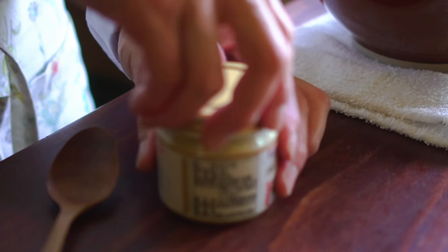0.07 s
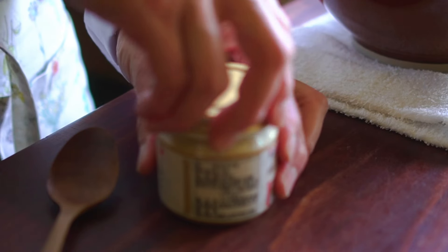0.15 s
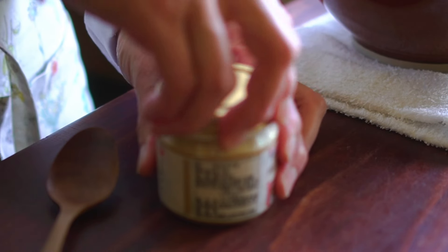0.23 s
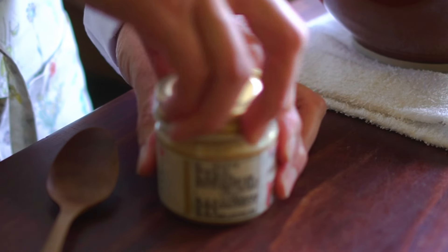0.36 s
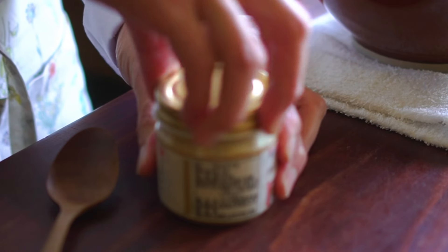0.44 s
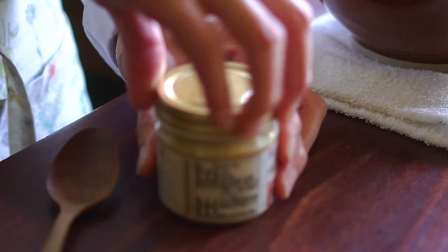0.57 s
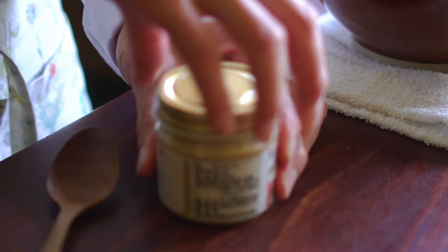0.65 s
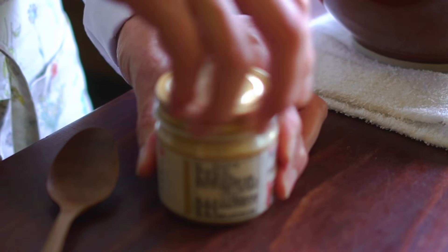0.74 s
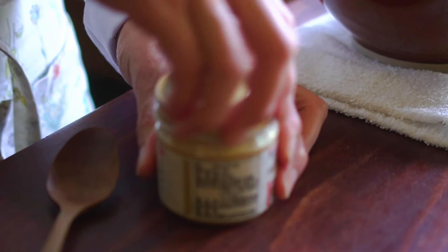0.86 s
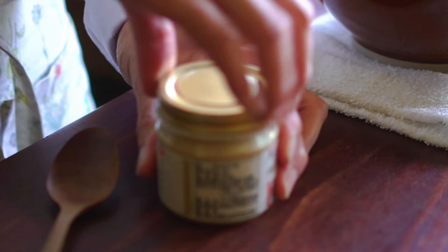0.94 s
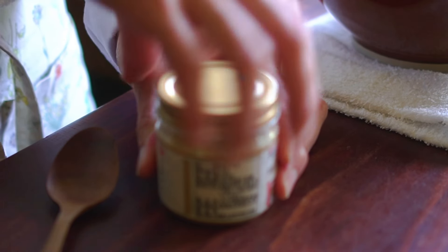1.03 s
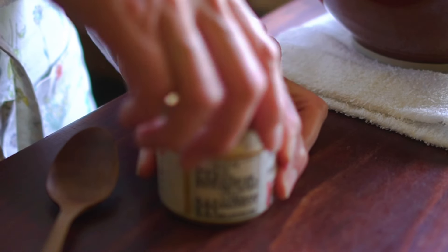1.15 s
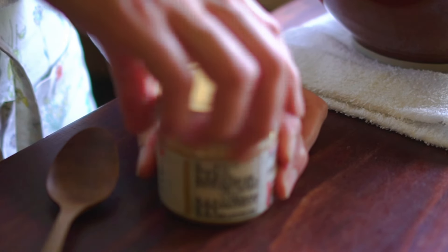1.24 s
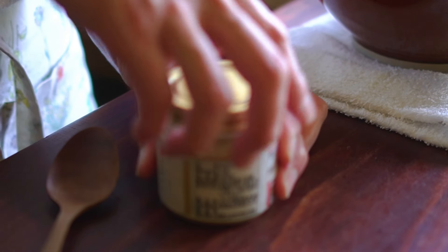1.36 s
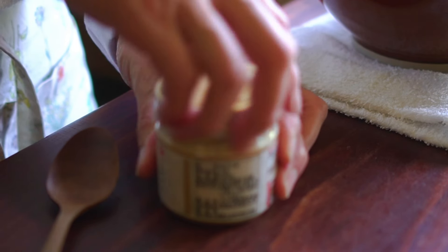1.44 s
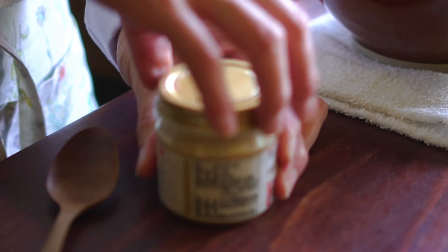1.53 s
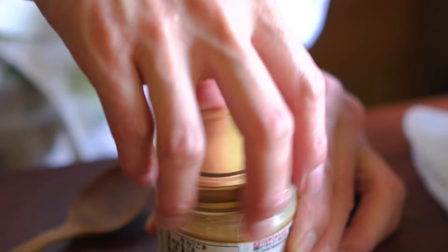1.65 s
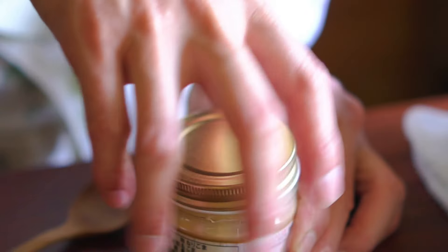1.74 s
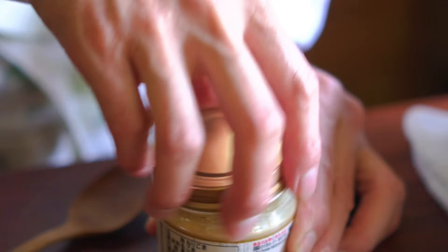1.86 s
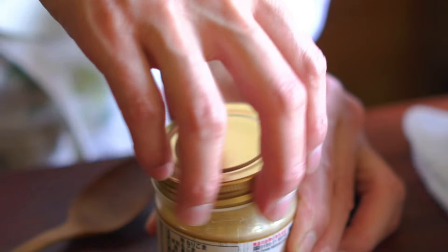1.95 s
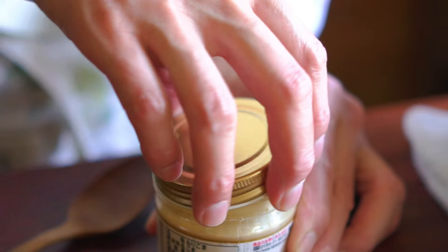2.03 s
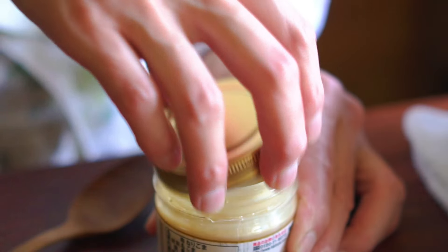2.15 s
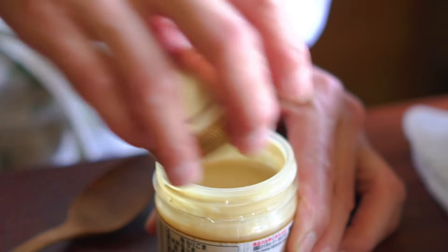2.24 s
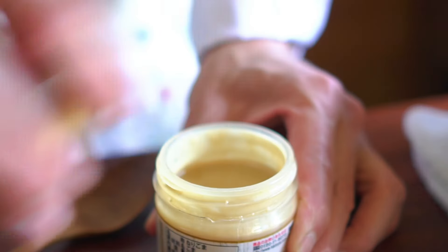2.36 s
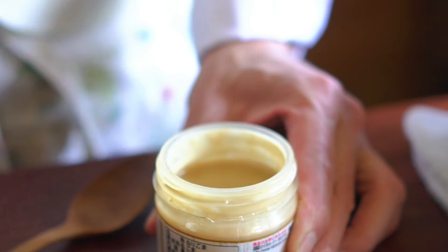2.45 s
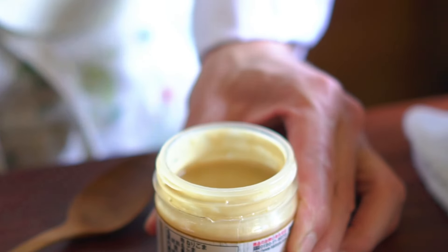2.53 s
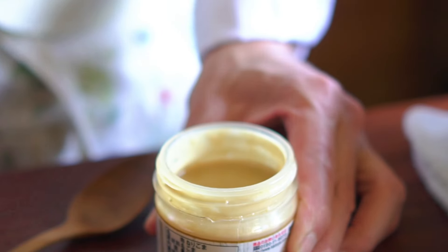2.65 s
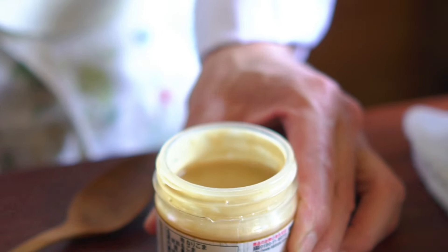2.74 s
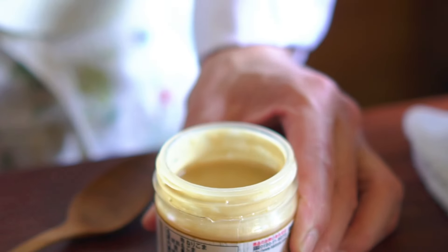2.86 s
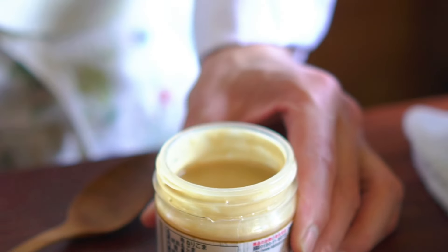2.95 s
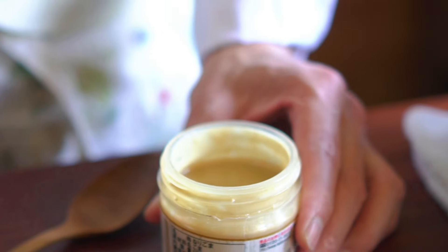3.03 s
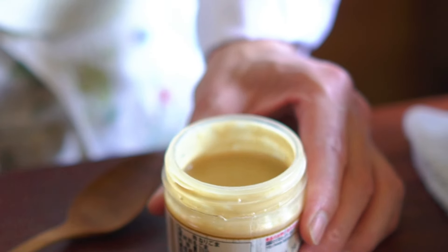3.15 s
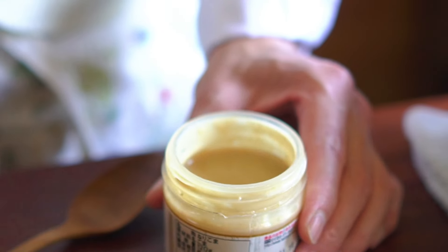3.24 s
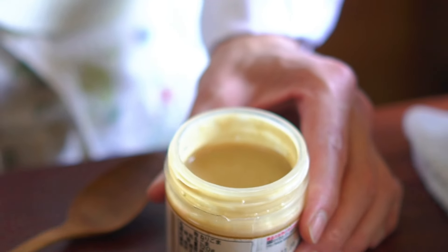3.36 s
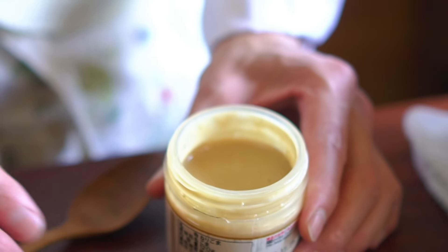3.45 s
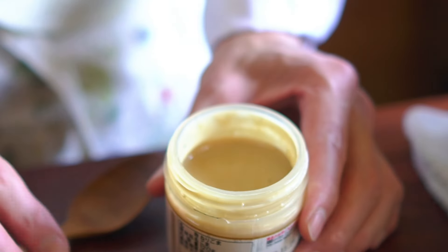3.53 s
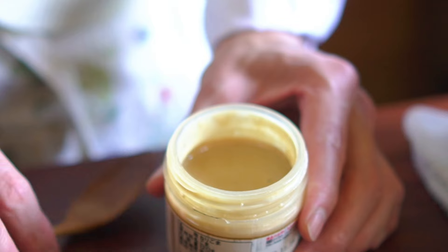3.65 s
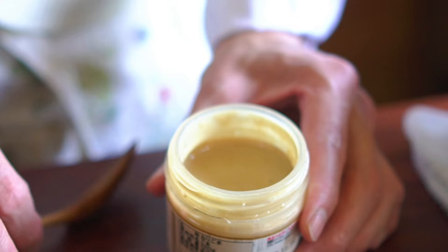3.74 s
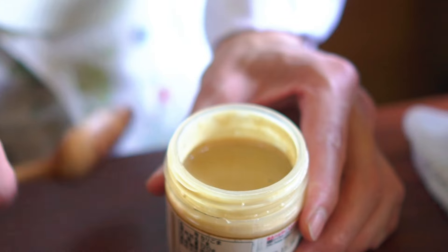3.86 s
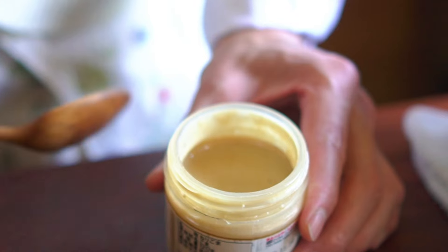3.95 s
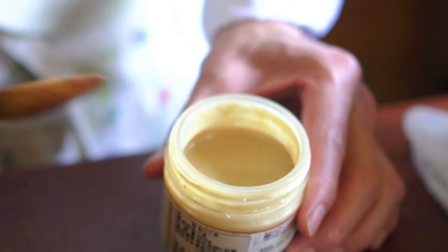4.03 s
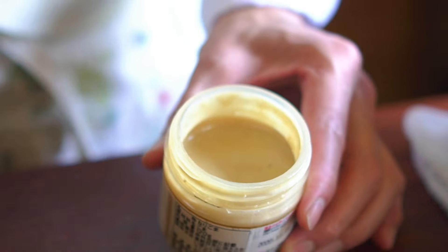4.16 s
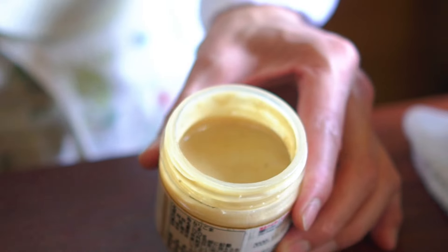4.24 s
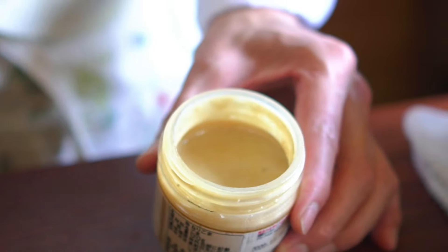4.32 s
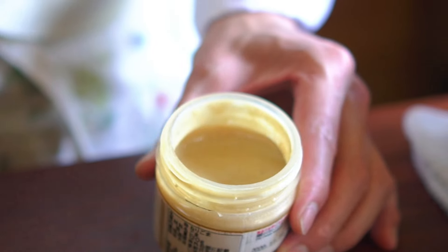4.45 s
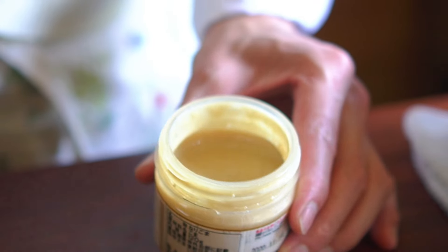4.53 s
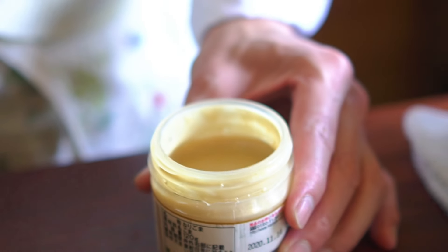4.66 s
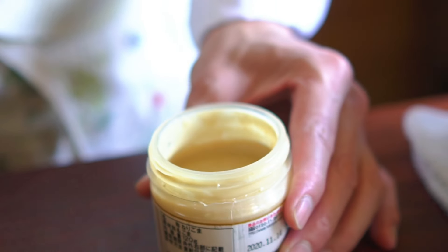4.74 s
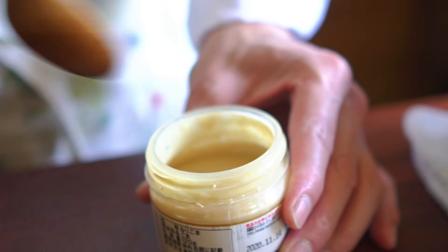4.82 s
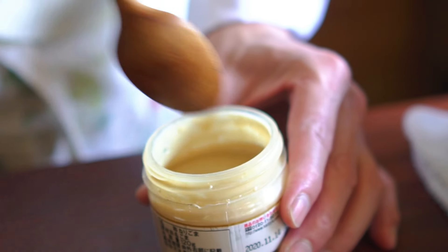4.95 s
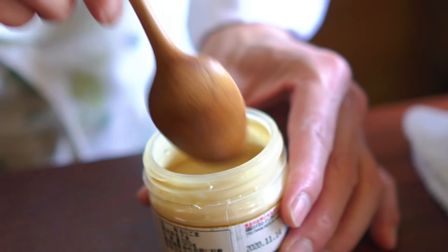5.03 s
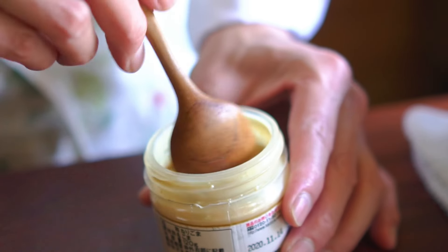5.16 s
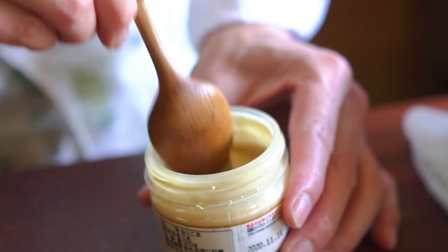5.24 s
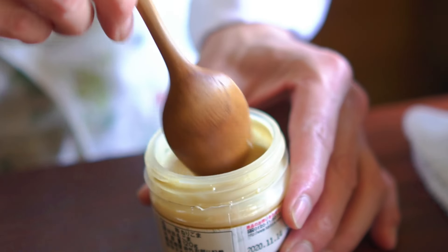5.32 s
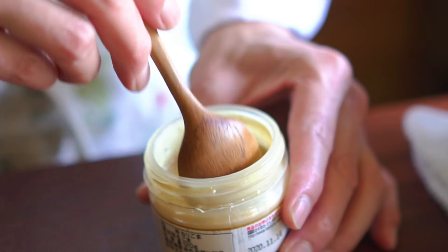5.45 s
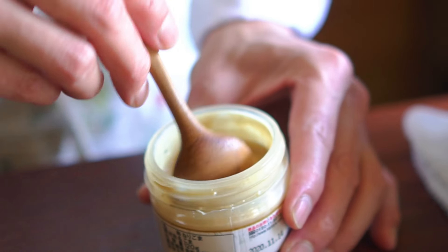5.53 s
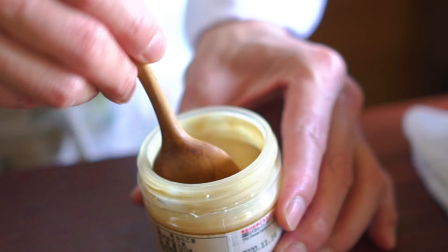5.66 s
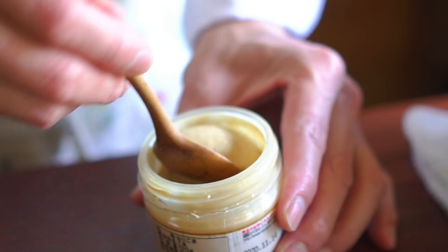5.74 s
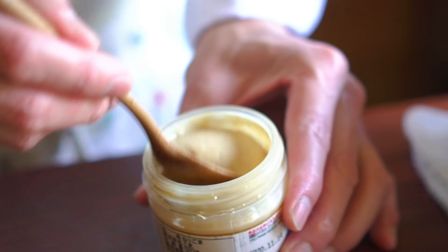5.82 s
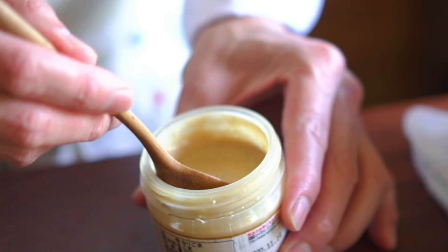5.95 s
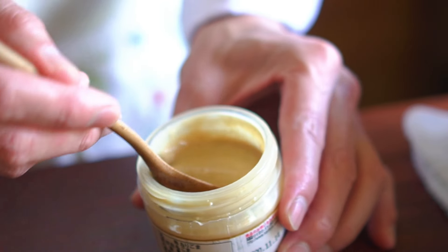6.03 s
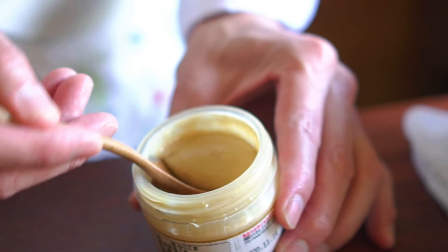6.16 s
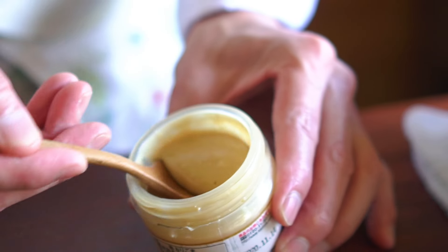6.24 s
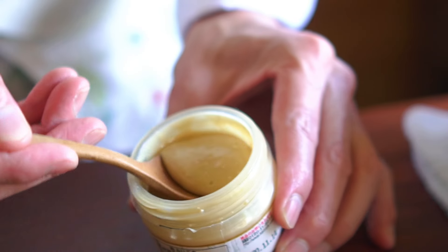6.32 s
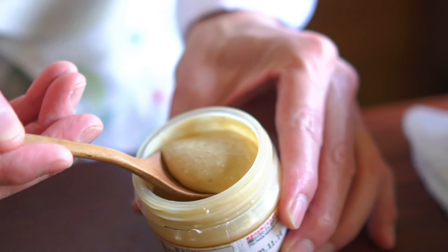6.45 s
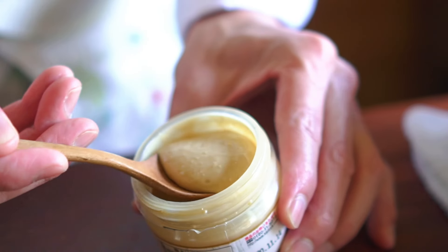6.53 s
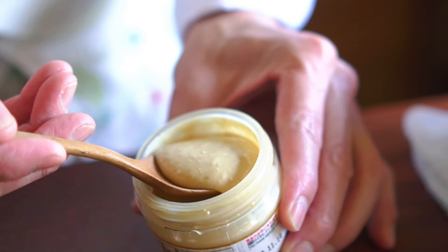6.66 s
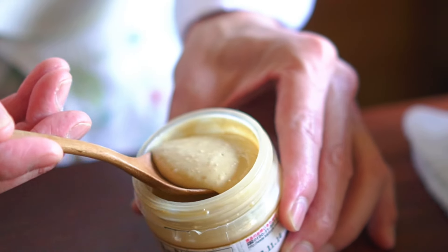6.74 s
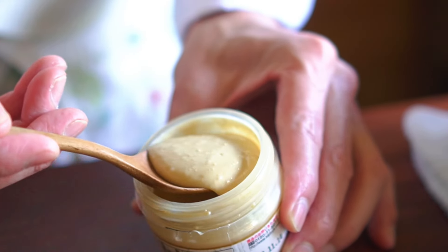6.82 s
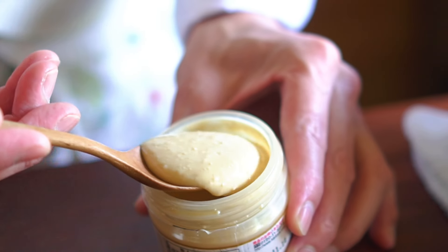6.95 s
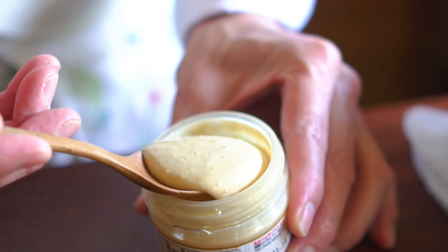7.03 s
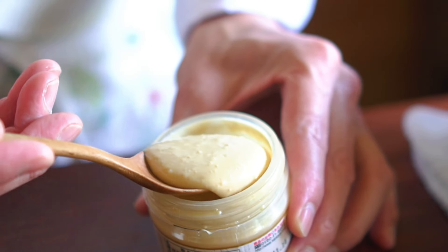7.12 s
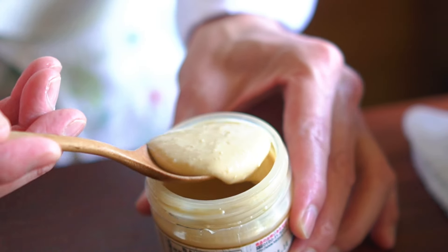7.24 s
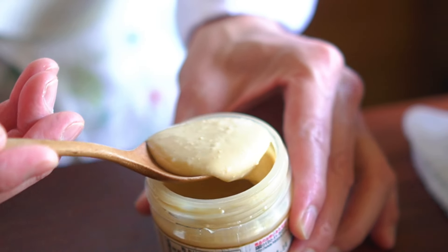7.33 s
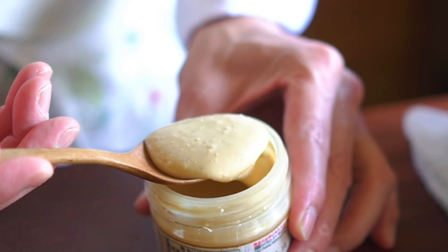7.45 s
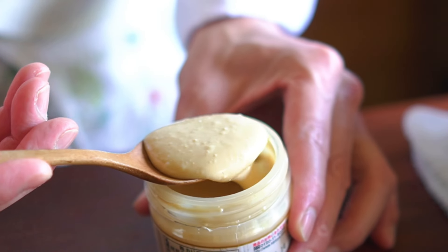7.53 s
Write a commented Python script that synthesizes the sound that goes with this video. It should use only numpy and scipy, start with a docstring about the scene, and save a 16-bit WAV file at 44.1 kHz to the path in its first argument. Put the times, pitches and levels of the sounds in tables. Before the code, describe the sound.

A metal lid is twisted off a glass jar close by, over the low rumble of a small kitchen. For the first 1.6 seconds, the thread rasps in several gritty pushes, with sharp cracks loudest around 0.3 to 0.6 seconds, dull jar knocks and table thuds. The sound drops out briefly near 1.7 seconds, returning with a last, thinner scrape and a thud. The lid bumps the rim at about 2.1 seconds, touches the wooden table at 2.7, then clatters in quickening bounces to rest by 3.2. Light clicks follow around 3.5 as a wooden spoon is picked up. From 4 to 5 seconds, it slides through dry fingers with a faint, squeaky hiss. It clinks lightly on the glass at 5.1, then scrapes very faintly through thick paste, with soft, damped knocks near 6.1, 7 and 7.5 seconds.

```python
"""Over the low rumble of a small kitchen, a metal lid is twisted off a glass jar close by: grit in the
thread rasps and cracks by stick-slip friction, and the table thuds below. The lid is lifted and put
on the wooden table, where it bounces ever faster, each impact exciting its modes, and rattles to rest.
Then a wooden spoon is picked up and slides through the fingers, the dry skin squeaking on it.
Last, it scrapes through a thick paste and knocks softly in the jar, damped by the filling."""
import sys
import numpy as np
from scipy import signal
from scipy.io import wavfile
from scipy.ndimage import uniform_filter1d

SR = 44100
rng = np.random.default_rng(int(sys.argv[2]) if len(sys.argv) > 2 else 0)


def int16_out(signal):
    """Quantize to a 16-bit WAV file."""
    q = np.round(np.clip(np.atleast_2d(signal).T, -1, 1) * 32767)
    wavfile.write(sys.argv[1], SR, q.astype(np.int16))


N = 334489
TIME = np.arange(N) / SR
RING_TIME = np.arange(SR // 2) / SR

# spectrum of the room tone: f/Hz, level/dB
ROOM_SPECTRUM = [(20, -11.5), (48, 1.5), (100, 1.5), (190, -15.5), (240, -12.5), (400, -27.5), (1200, -43),
                 (2200, -50.5), (4000, -49.5), (5000, -46), (14200, -48.5)]
# set gain curve on the steady room tone, as of a noise suppressor: t/s, rumble gain/dB, hiss gain/dB
SUPPRESSOR_GAIN = [(.1, 3.5, 1.5), (.78, -5.5, -16.5), (1.7, 6.5, 19), (2.1, 0, 6), (2.85, -2.5, 2.5),
                   (3.38, -1, -9), (3.52, 1.5, 7), (5.15, -1.5, 3.5), (5.3, -2, 0), (5.6, -0.5, 6),
                   (7.58, -0.5, 5.5)]
# reverberation time of the kitchen: f/Hz, T60/s
REVERB_TIMES = [(100, .68), (500, .28), (1200, .22), (3000, .31), (8000, .18)]
# thuds of the table top: t/s, level/dB
THUDS = [(0.167, -24.5), (0.346, -22.5), (0.56, -33.5), (1.124, -31.5), (1.454, -21), (1.848, -15),
         (2.907, -23), (3.068, -29), (3.568, -32), (6.207, -26.5), (7.05, -29)]
# lid and spoon brush the glass rim: t/s, level/dB
CLINKS = [(2.18, -46), (5.127, -36)]
# modes of the glass rim: f/Hz, level/dB
GLASS_MODES = [(2680, 0), (3570, -3), (4080, -1)]
# clicks as lid and spoon are handled: t/s, level/dB, centre f/Hz
CLICKS = [(1.122, -37.5, 2570), (2.4338, -32, 3100), (3.438, -36, 700), (3.708, -32.5, 1110),
          (3.776, -38.5, 1490), (5.1, -38.5, 4600), (5.1254, -34, 3825)]
# spectrum common to these clicks: f/Hz, level/dB
CLICK_SPECTRUM = [(700, 6.5), (1400, -11.5), (2600, -4), (5200, -7), (8200, 3.5), (16000, -16)]
# fingers and spoon knock on the filled jar: t/s, level/dB, centre f/Hz
JAR_KNOCKS = [(0.823, -38.5, 467), (1.121, -30.5, 271.7), (1.289, -26.5, 366), (1.413, -20.5, 282),
              (1.522, -25, 314), (1.633, -21, 402), (1.848, -21, 188), (3.437, -27.5, 453),
              (6.082, -33, 487), (6.127, -28.5, 500), (7.045, -29.5, 363), (7.474, -38.5, 613)]
# the lifted lid bumps the jar's mouth: t/s, level/dB
LIFT_BUMPS = [(2.076, -24), (2.148, -31.5)]
# spectrum of the lid damped by the fingers: f/Hz, level/dB
HELD_LID_SPECTRUM = [(500, -30), (800, -18.5), (1000, -10.5), (1180, 2), (1350, -24.5), (1700, -48.5)]
# strokes of the spoon along the wall and through the paste: peak t/s, rise and fall/s, level/dB
SCRAPES = [(5.141, 0.05, -51), (6.15, 0.24, -61), (6.895, 0.065, -61.5)]
# spectrum of that scraping: f/Hz, level/dB
SCRAPE_SPECTRUM = [(2000, 4), (5500, -6), (8300, 4.5), (14000, -6)]
# wet ticks of air pockets in the paste: t/s, level/dB, centre f/Hz, T60/s
PASTE_TICKS = [(5.241, -31.5, 13170, 0.0085), (5.885, -54, 1470, 0.12)]
# fingers slide along the spoon: peak t/s, rise and fall/s, rub level/dB, sizzle level/dB
SLIDES = [(3.98, 0.21, -56, -66), (4.148, 0.085, -42.5, -49.5), (4.321, 0.051, -55.5, -62),
          (4.48, .06, -64, -82), (4.625, 0.046, -46, -64), (4.669, 0.011, -40, -53),
          (4.775, 0.098, -47.5, -51), (4.927, 0.034, -35, -33)]
# spectrum of skin rubbing on wood: f/Hz, level/dB
SKIN_SPECTRUM = [(2500, -21), (4700, -17), (7300, -1.5), (12000, 7.5), (15000, -8)]
# resonances of skin squeaking on wood: f/Hz, width/Hz, relative level/dB
SKIN_RESONANCES = [(3550, 340, -15), (6400, 380, -1), (8500, 700, -2), (12000, 800, -2)]
# modes of the free lid: f/Hz, level/dB, T60/s
LID_MODES = [(1092.9, -23, .05), (1136, -11.5, 0.044), (1208.4, -4, 0.043), (2080, -25, 0.048),
             (2532, -13.5, .05), (2729, -14.5, 0.021), (2835, -4, 0.031), (2967, 0, 0.022),
             (3560, -18.5, 0.026), (3976, -11, 0.035), (7160, -19.5, .025)]
# spectrum of the lid's rim striking the table: f/Hz, level/dB
CLATTER_SPECTRUM = [(100, -42), (450, -12), (650, -7), (900, -18), (1190, -5), (1450, -11), (2000, -5.5),
                    (2230, -11), (2880, -0.5), (3250, -10), (4000, -1), (4750, -14), (6750, -12.5),
                    (7800, -18.5), (8150, -12.5), (9200, -26), (15000, -29.5)]
# strength of each bounce in turn: relative level/dB
BOUNCE_LEVELS = [0, -1, -2, -8, -10, -6, -9]
# the loudest grains cracking in the thread: t/s, level/dB, lower band edge f/Hz
SNAPS = [(0.161, -15, 5000), (0.3065, 0.5, 4700), (0.3348, -10.5, 5300), (.3807, -8.5, 7500),
         (.3937, -2, 5900), (0.3963, -6, 7500), (0.4108, -4.5, 7900), (0.4326, -5, 6000),
         (0.451, -10.5, 6900), (0.5247, -13, 3510), (.562, -3, 5960), (0.5666, 0, 4196),
         (0.821, -27.5, 4750), (1.3214, -17.5, 6800), (1.335, -15, 6200), (1.4557, -30, 7550),
         (1.4777, -18, 6900), (1.4922, -7.5, 6760)]
# pushes on the lid: start t/s, peak t/s, rise/s, fall/s, grit level/dB, jar body level/dB
PUSHES = [(0.153, 0.16, 0.02, 0.43, -41.5, -62.5), (0.295, 0.396, 0.14, 0.23, -29, -65),
          (0.548, 0.551, 0.057, 0.074, -32.5, -62), (0.855, 0.945, 0.08, 0.029, -28.5, -39),
          (1.167, 1.222, 0.057, 0.13, -29.5, -37.5), (1.388, 1.51, 0.082, 0.029, -22.5, -37),
          (1.844, 1.915, 0.11, 0.11, -29.5, -51)]
# spectrum of grit under the tight lid: f/Hz, level/dB
TIGHT_GRIT_SPECTRUM = [(1300, -15.5), (2300, -22), (3500, -8), (5300, -7), (7000, -1.5), (9000, 6),
                       (11000, -4.5), (12600, -9), (14400, -9.5)]
# spectrum of grit under the loose lid: f/Hz, level/dB
LOOSE_GRIT_SPECTRUM = [(2200, -59.5), (3800, -18.5), (5300, -23), (6500, -1), (8000, 4), (9500, -4),
                       (14500, -13)]
# spectrum of the jar's grinding body: f/Hz, level/dB
JAR_SPECTRUM = [(100, 0.5), (240, 5), (480, 6), (600, -6.5), (720, 1.5), (900, -11.5), (1170, 6),
                (1550, -26.5), (3000, -16), (6000, -35)]
# rasps of the tight lid: peak t/s, rise and fall/s, centre f/Hz, glide/(octaves/s), level/dB
RASPS = [(0.449, 0.12, 4255, 2.5, -47), (0.59, 0.09, 4400, -.5, -43.5), (0.872, 0.042, 4550, -2.5, -46)]

BAND_LIMIT_HZ = 15300


def amp(db):
    """Amplitude ratio of a level in decibels."""
    return 10 ** (np.asarray(db) / 20)


def unit_rms(x):
    """Normalisation to an rms of one."""
    return x / np.sqrt(np.mean(x ** 2) + 1e-20)


def unit_peak(x):
    """Normalisation to a peak of one."""
    return x / (abs(x).max() + 1e-20)


def read(points, hz):
    """Interpolation of a table on a logarithmic frequency axis."""
    f, value = np.transpose(points)
    return np.interp(np.log(hz + 1), np.log(f + 1), value)


def add(mix, s, sound):
    """Superposition: a sound joins the mix at time s."""
    part = mix[max(round(s * SR), 0):][:len(sound)]
    part += sound[:len(part)]


def cut(x, hz, kind, order=2):
    """Maximally flat low-pass or high-pass filtering."""
    return signal.sosfilt(signal.butter(order, min(hz, SR / 2 - 1), kind, fs=SR, output="sos"), x)


def colour(x, spectrum, size=4096):
    """Minimum-phase filtering: a causal response with the given spectrum."""
    log_gain = np.log(amp(read(spectrum, abs(np.fft.fftfreq(size, 1 / SR)))))
    response = np.fft.ifft(np.exp(np.conj(signal.hilbert(log_gain)))).real
    return signal.oaconvolve(x, response[:size // 2])[:len(x)]


def hump(centre_hz, octaves):
    """Resonance curve: a single peak, symmetric in log frequency."""
    hz = np.geomspace(20, SR / 2, 200)
    return np.c_[hz, -46 * np.log10(1 + (np.log2(hz / centre_hz) / octaves) ** 2)]


def resonate(x, hz, width_hz):
    """Forced vibration of a steep resonance whose centre follows the curve hz."""
    carrier = np.exp(2j * np.pi * np.cumsum(hz) / SR)
    pole = np.exp(-np.pi * width_hz / SR)
    baseband = signal.lfilter([(1 - pole) ** 2], [1, -2 * pole, pole * pole], x / carrier + 1e-18)
    return unit_rms((carrier * baseband).real)


def decay(t60):
    """Damping: an exponential fall of 60 dB in t60 seconds."""
    return np.exp(-np.log(1000) * RING_TIME / t60)


def burst(t60):
    """Decaying noise: a contact breaks up into a scatter of tiny impacts."""
    return rng.standard_normal(len(RING_TIME)) * decay(t60)


def knock(spectrum, centre_hz, t60, scatter_db):
    """Damped impact: a force pulse and a dying scatter; the longer the pulse, the duller the sound."""
    phase = 2 * np.pi * centre_hz * RING_TIME
    blow = unit_peak(colour(phase * np.exp(-2 * phase), spectrum))
    return unit_peak(blow + amp(scatter_db) * unit_peak(colour(burst(t60), spectrum)))


def slips(per_s, spread_db):
    """Stick-slip friction: random impulses of uneven size."""
    size = amp(spread_db * np.minimum(rng.exponential(1, N), 4))
    return size * rng.choice([-1, 1], N) * (rng.random(N) < per_s / SR)


def dry_friction(grains_db):
    """Friction noise: countless slips merge into a hiss, with sparse coarser grains in it."""
    grains = signal.oaconvolve(slips(per_s=260, spread_db=2.5), burst(t60=.003))[:N]
    return unit_rms(rng.standard_normal(N) + amp(grains_db) * unit_rms(grains * rng.standard_normal(N)))


def pressure(depth_db, samples):
    """Amplitude modulation: the force of a hand wavers within milliseconds."""
    return amp(depth_db * unit_rms(uniform_filter1d(rng.standard_normal(N), samples)))


def swell(s, rise, fall, db):
    """Envelope of a push: 20 dB below its peak one rise time before s and one fall time after."""
    before, after = np.maximum(s - TIME, 0) / rise, np.maximum(TIME - s, 0) / fall
    return amp(db - 20 * (before ** 1.1 + after ** 1.43))


def rasp(friction, s, length, hz, octaves_per_s, db, width_hz):
    """Source and filter: friction swells and fades through a gliding resonance."""
    centre_hz = hz * 2 ** (octaves_per_s * np.clip(TIME - s, -length, length))
    return resonate(friction, centre_hz, width_hz) * swell(s, length, length, db)


def room_tone():
    """Steady rumble and hiss, turned down and back up along a set curve, as by a noise suppressor."""
    tone = amp(-45) * unit_rms(colour(rng.standard_normal(N), ROOM_SPECTRUM, size=16384))
    times, rumble_db, hiss_db = np.transpose(SUPPRESSOR_GAIN)
    rumble = cut(tone, 450, "low", order=3) * amp(np.interp(TIME, times, rumble_db))
    hiss = cut(tone, 450, "high", order=3) * amp(np.interp(TIME, times, hiss_db))
    return rumble + hiss


def kitchen(x):
    """Reverberation: dense reflections follow a short gap, and each band decays at its own rate."""
    reflections_per_s, gap_s = 5000, .006
    signs = rng.choice([-1., 1.], len(RING_TIME))
    arrivals = (rng.random(len(RING_TIME)) < reflections_per_s / SR) * (RING_TIME > gap_s)
    hz, t, bands = signal.stft(signs * arrivals, SR, nperseg=256)
    absorption = np.exp(-np.log(1000) * t / read(REVERB_TIMES, hz)[:, None])
    tail = signal.istft(bands * absorption, SR, nperseg=256)[1]
    return signal.oaconvolve(x, tail / np.linalg.norm(tail))[:N]


def table_thuds():
    """Plate vibration: pushed by jar or lid, the table top swings in its three lowest modes."""
    lowest_hz = 56
    phase = 2 * np.pi * lowest_hz * RING_TIME
    upper_modes = decay(t60=.19) * (amp(-19) * np.sin(2.9 * phase) + amp(-14) * np.sin(3.4 * phase))
    onset = 1 - np.exp(-RING_TIME / .0067)
    thud = unit_peak((np.sin(phase) + upper_modes) * decay(t60=.38) * onset)
    out = np.zeros(N)
    for s, db in THUDS:
        add(out, s, amp(db) * thud)
    return out


def glass_clinks():
    """Free vibration: the glass rim rings briefly, damped by the hand around the jar."""
    modes = sum(amp(db) * np.sin(2 * np.pi * hz * RING_TIME) for hz, db in GLASS_MODES)
    ring = unit_peak(modes * decay(t60=.04))
    out = np.zeros(N)
    for s, db in CLINKS:
        add(out, s, amp(db) * ring)
    return out


def handling_clicks():
    """Brief contacts have broad spectra: small hard things give light, scratchy clicks."""
    out = np.zeros(N)
    for s, db, centre_hz in CLICKS:
        contact = knock(hump(centre_hz, octaves=2.6), centre_hz, t60=.04, scatter_db=.5)
        add(out, s, amp(db) * unit_peak(colour(contact, CLICK_SPECTRUM)))
    return out


def jar_knocks():
    """Heavy damping: paste dulls the knocks on the jar, and fingers the bumps of the lifted lid."""
    out = np.zeros(N)
    for s, db, centre_hz in JAR_KNOCKS:
        bump = knock(hump(centre_hz, octaves=2.1), centre_hz, t60=.12, scatter_db=-8)
        add(out, s, amp(db) * cut(bump, 845, "low", order=4))
    for s, db in LIFT_BUMPS:
        add(out, s, amp(db) * knock(HELD_LID_SPECTRUM, centre_hz=1030, t60=.092, scatter_db=-7))
    return out


def spoon_in_paste():
    """Stick-slip friction: the spoon scrapes in the paste and squeaks on the rim; air pockets tick."""
    sticking = dry_friction(grains_db=-2.5)
    scrape = unit_rms(colour(sticking, SCRAPE_SPECTRUM))
    out = sum(scrape * swell(s, length, length, db) for s, length, db in SCRAPES)
    out += rasp(sticking, s=6.898, length=.055, hz=7850, octaves_per_s=-.7, db=-55, width_hz=450)
    for s, db, centre_hz, t60 in PASTE_TICKS:
        add(out, s, amp(db) * knock(hump(centre_hz, octaves=.23), centre_hz, t60, scatter_db=1))
    return out


def fingers_on_spoon():
    """Friction-driven resonance: dry skin crackles, sizzles and squeaks along the wooden handle."""
    catches = dry_friction(grains_db=-2.5)
    rub = unit_rms(colour(catches, SKIN_SPECTRUM))
    sizzle = unit_rms(cut(cut(catches, 13600, "high", order=6), BAND_LIMIT_HZ, "low", order=8))
    wander = 1 + .012 * unit_rms(cut(rng.standard_normal(N), 5.4, "low"))
    # each resonance catches and lets go by itself
    squeak = sum(amp(db) * resonate(catches * pressure(depth_db=4.5, samples=1300), hz * wander, width)
                 for hz, width, db in SKIN_RESONANCES)
    out = np.zeros(N)
    for s, length, rub_db, sizzle_db in SLIDES:
        # in decibels, the squeak grows half as fast as the rub
        slide = rub * amp(rub_db) + sizzle * amp(sizzle_db) + squeak * amp(-31 + rub_db / 2)
        out += slide * swell(s, length, length, db=0)
    return out


def lid_impact(ring, ring_db, contact_db, cutoff_hz):
    """Impact of lid on table: ring, rim clatter and a sharp tick; softer contact passes less treble."""
    clatter = unit_peak(colour(burst(t60=.0476), CLATTER_SPECTRUM))
    tick = unit_peak(cut(colour(burst(t60=.016), CLATTER_SPECTRUM), 4800, "high"))
    blow = amp(ring_db) * ring + amp(contact_db) * (amp(-4) * clatter + amp(-2.5) * tick)
    return cut(blow, cutoff_hz, "low", order=3)


def settling_lid():
    """Inelastic rebound: the lid drops and bounces at geometrically shrinking gaps, its rim rolling."""
    touch_s, drop_s, first_gap_s, restitution = 2.7446, 2.8915, .0707, .796
    soft_hz, hard_hz, cutoff_hz_per_db = 3650, 15900, 587.5
    modes = np.array([amp(db) * decay(t60) * np.sin(2 * np.pi * hz * RING_TIME)
                      for hz, db, t60 in LID_MODES])
    # neighbouring modes swing in opposite directions at the point of contact
    signs = (-1) ** np.arange(len(modes))
    ring = signs @ modes
    out = np.zeros(N)
    # one edge is set down first, softly
    add(out, touch_s, lid_impact(ring, ring_db=-3, contact_db=-10, cutoff_hz=soft_hz))
    times = drop_s + first_gap_s * (1 - restitution ** np.arange(len(BOUNCE_LEVELS))) / (1 - restitution)
    for s, db in zip(times, BOUNCE_LEVELS):
        # each bounce lands elsewhere on the rim and shares its force differently among the modes
        shares = signs * amp(2 * rng.standard_normal(len(modes)))
        cutoff_hz = max(hard_hz + cutoff_hz_per_db * db, soft_hz)
        add(out, s, lid_impact(shares @ modes, ring_db=-16, contact_db=db - 4, cutoff_hz=cutoff_hz))
        # the rolling rim touches down a moment before each bounce
        add(out, s - .003, amp(db - 17) * unit_peak(colour(burst(t60=.0336), CLATTER_SPECTRUM)))
    rolling = slips(per_s=1800, spread_db=-2)
    rim_clatter = unit_rms(colour(rolling, CLATTER_SPECTRUM))
    rim_ring = amp(-20) * unit_rms(signal.oaconvolve(rolling, ring)[:N])
    is_rolling = (TIME > drop_s) * (TIME < times[-1] + .02)
    roll_db = -30 - 18 * np.maximum(TIME - drop_s, 0)
    return out + (rim_clatter + rim_ring) * is_rolling * amp(roll_db)


def grit_snaps():
    """Brittle fracture: single grains crack in the thread, each a band-limited snap and weak scatter."""
    onset = np.minimum(RING_TIME / .0011, 1) ** 2
    out = np.zeros(N)
    for s, db, low_hz in SNAPS:
        crack = (burst(t60=.0065) + amp(-29) * burst(t60=.046)) * onset
        band = cut(cut(crack, low_hz, "high", order=7), 1.85 * low_hz, "low")
        add(out, s, amp(db) * unit_peak(band))
    return out


def twisting_lid():
    """Stick-slip friction in the gritty thread drives lid and jar; once loose, the lid sounds thinner."""
    loose_from_s, take_hold_s = 1.75, .0076
    grip = pressure(depth_db=3.5, samples=260)
    scrape = dry_friction(grains_db=-2) * grip
    body = unit_rms(colour(slips(per_s=1400, spread_db=-4.5) * grip, JAR_SPECTRUM))
    out = np.zeros(N)
    for start, s, rise, fall, grit_db, body_db in PUSHES:
        grit = unit_rms(colour(scrape, TIGHT_GRIT_SPECTRUM if s < loose_from_s else LOOSE_GRIT_SPECTRUM))
        onset = np.clip((TIME - start) / take_hold_s, 0, 1)
        out += (grit * swell(s, rise, fall, grit_db) + body * swell(s, rise, fall, body_db)) * onset
    return out + sum(rasp(scrape, *row, width_hz=900) for row in RASPS)


def scene():
    """Superposition of direct sound, reverberation, table thuds and room tone."""
    # sound, reverberant level/dB relative to it
    sources = [(twisting_lid(), -7), (grit_snaps(), -8), (settling_lid(), -3), (jar_knocks(), -3),
               (handling_clicks() + glass_clinks(), -3), (spoon_in_paste(), -15), (fingers_on_spoon(), -9)]
    direct = sum(sound for sound, room_db in sources)
    reverberant = kitchen(sum(amp(room_db) * sound for sound, room_db in sources))
    return (direct + reverberant + table_thuds() + room_tone())[None]


def record(dry):
    """Gain, clipping, band limit: the sound drops out before the lid's last turn and returns louder."""
    gain_db = np.interp(TIME, [1.66, 1.668, 1.79, 1.84], [-1.5, -86.5, -45, 2.5])
    clipped = np.clip(dry * amp(gain_db), -.88, .88)
    low_pass = signal.firwin(255, BAND_LIMIT_HZ, window=("kaiser", 9), fs=SR)
    return signal.oaconvolve(clipped, low_pass[None], "same")


dry = scene()
out = record(dry)
int16_out(out)
```